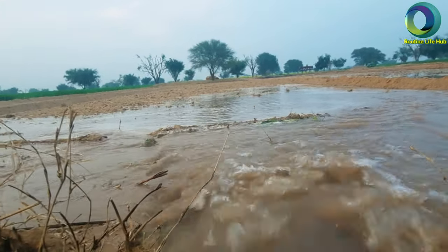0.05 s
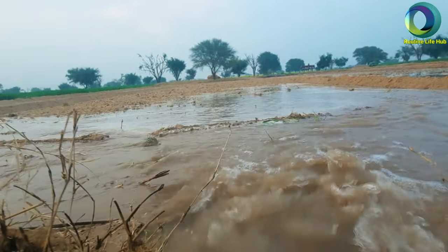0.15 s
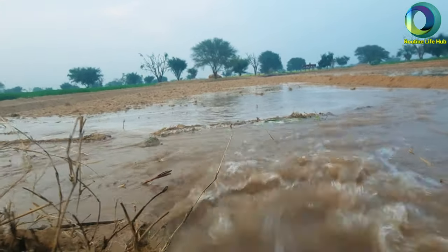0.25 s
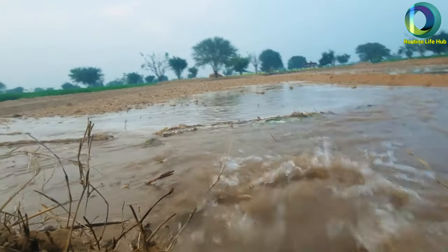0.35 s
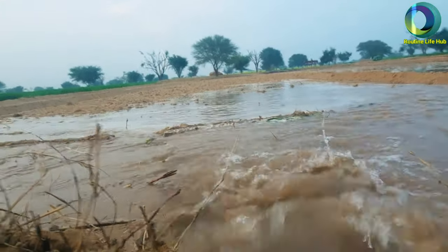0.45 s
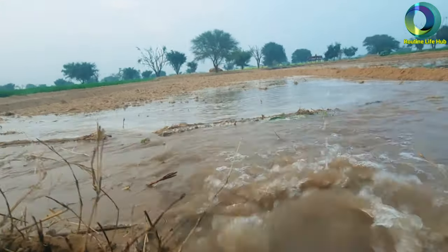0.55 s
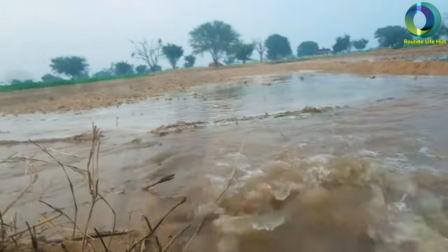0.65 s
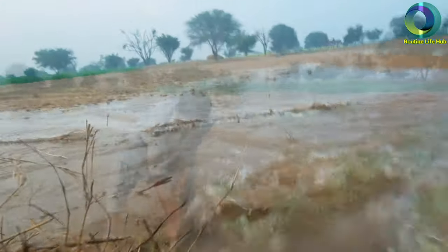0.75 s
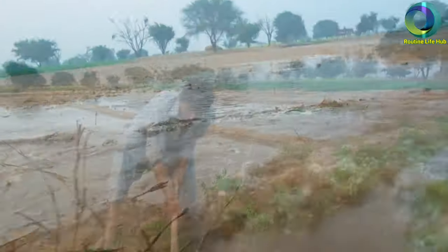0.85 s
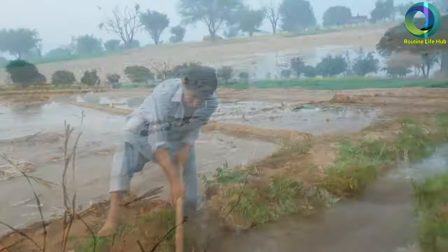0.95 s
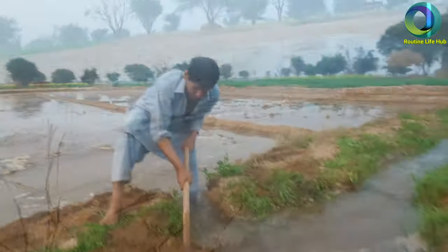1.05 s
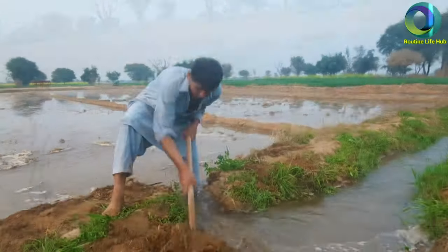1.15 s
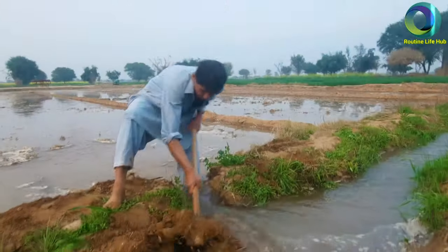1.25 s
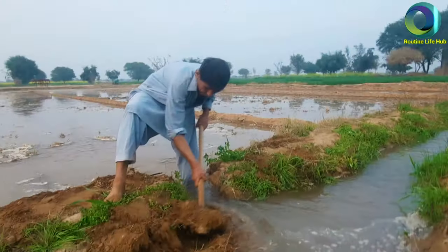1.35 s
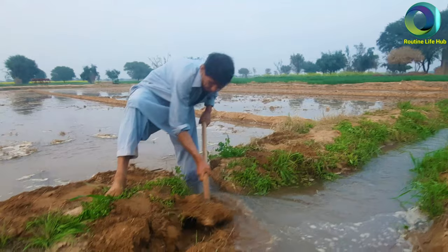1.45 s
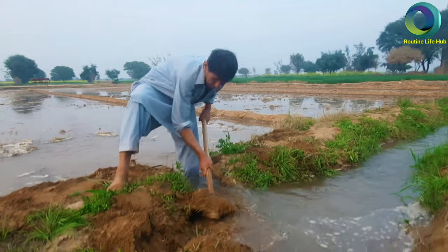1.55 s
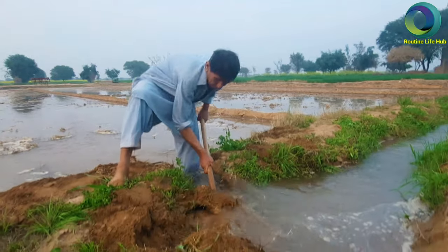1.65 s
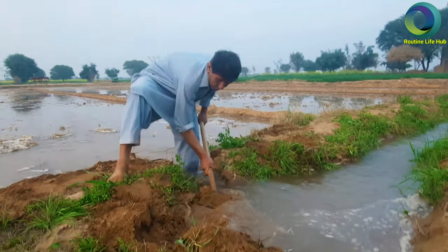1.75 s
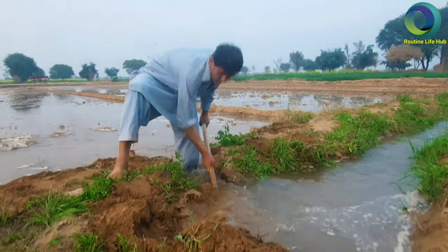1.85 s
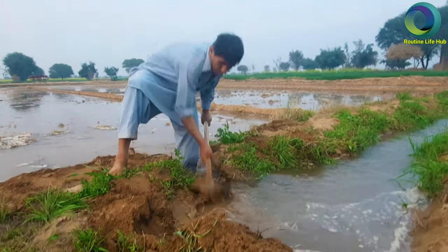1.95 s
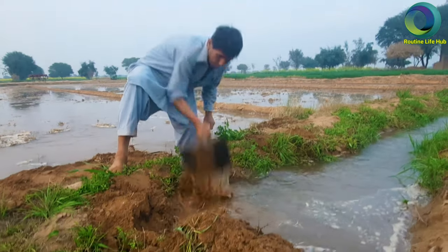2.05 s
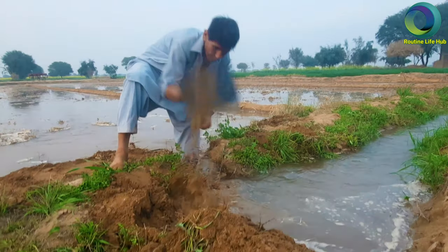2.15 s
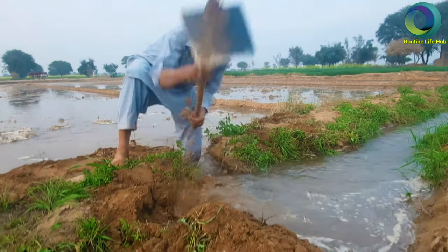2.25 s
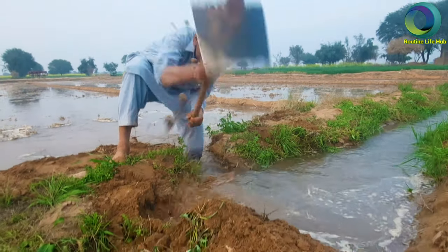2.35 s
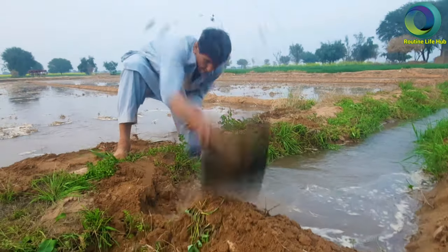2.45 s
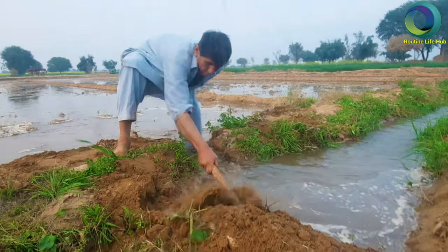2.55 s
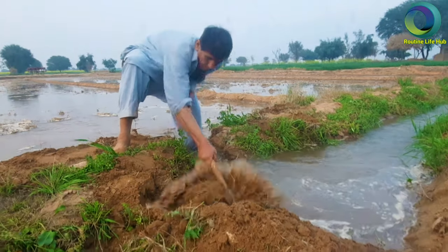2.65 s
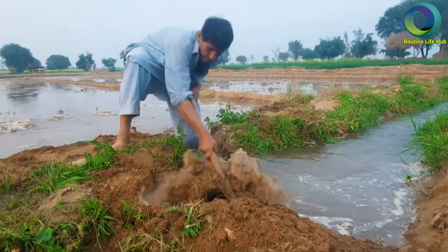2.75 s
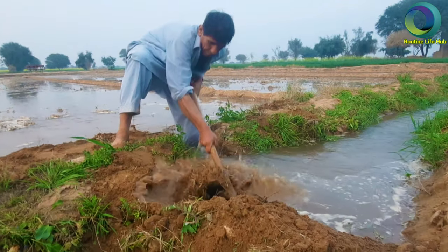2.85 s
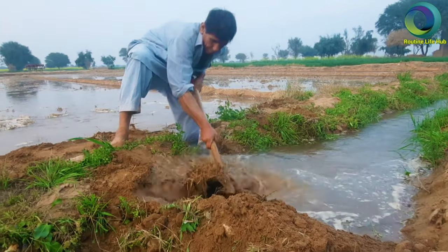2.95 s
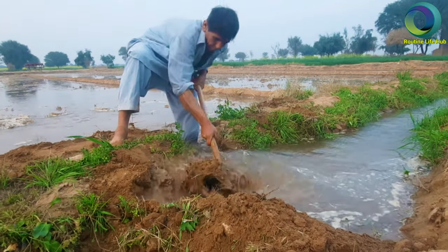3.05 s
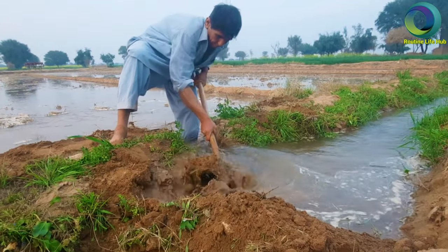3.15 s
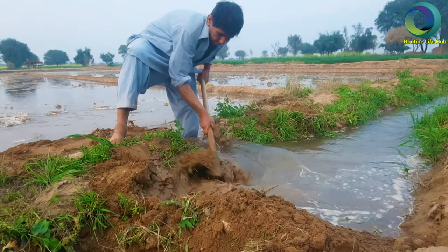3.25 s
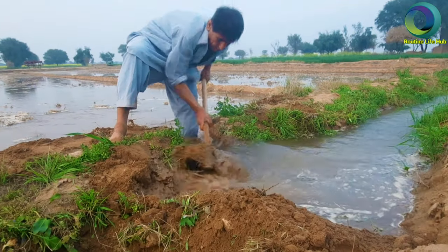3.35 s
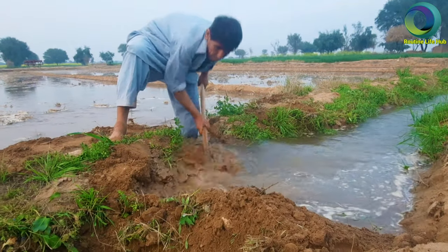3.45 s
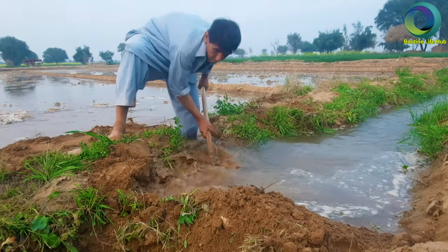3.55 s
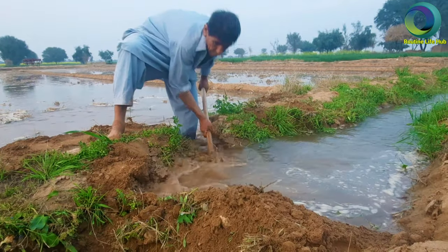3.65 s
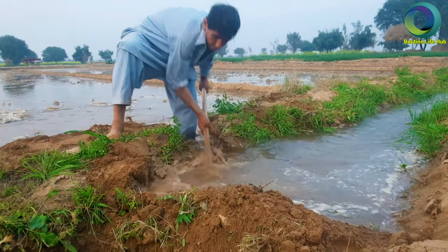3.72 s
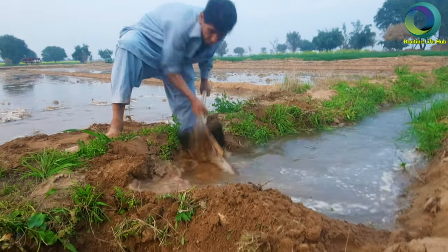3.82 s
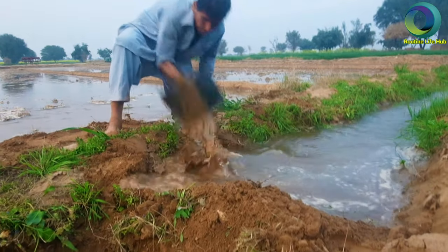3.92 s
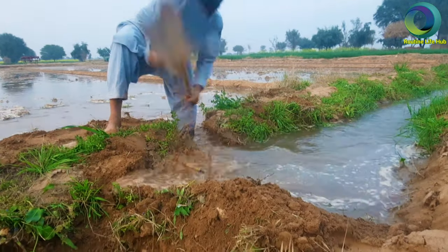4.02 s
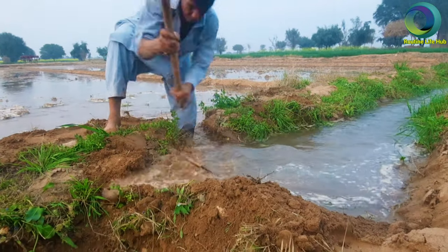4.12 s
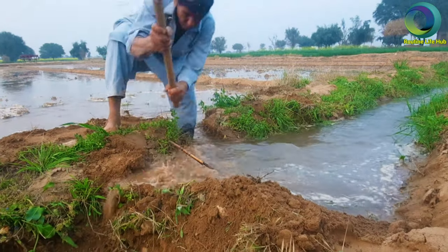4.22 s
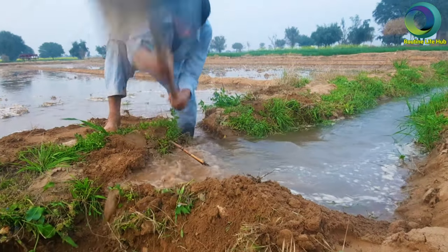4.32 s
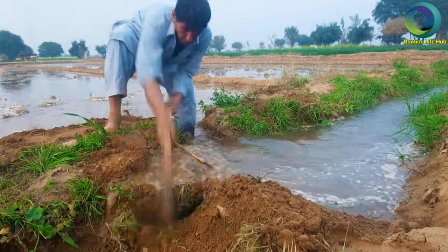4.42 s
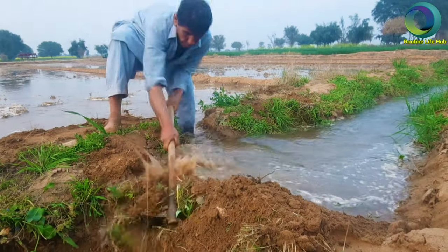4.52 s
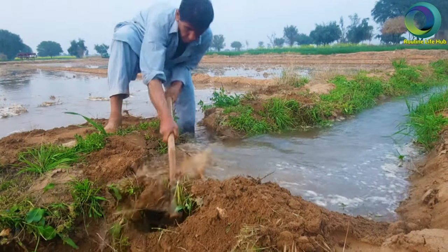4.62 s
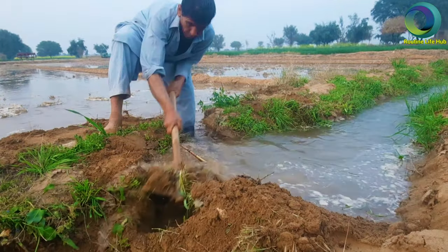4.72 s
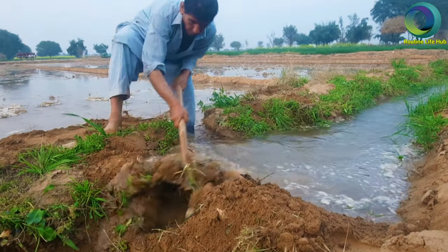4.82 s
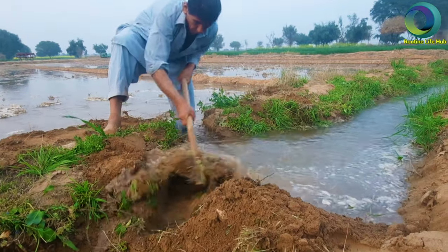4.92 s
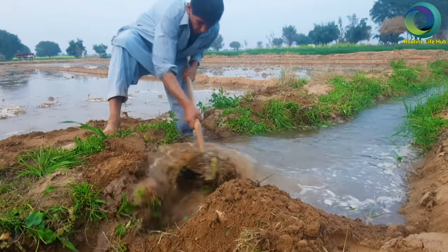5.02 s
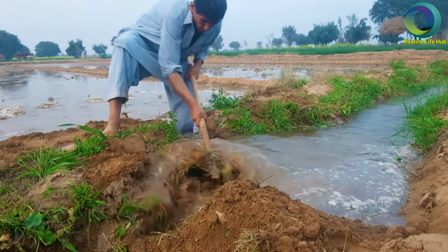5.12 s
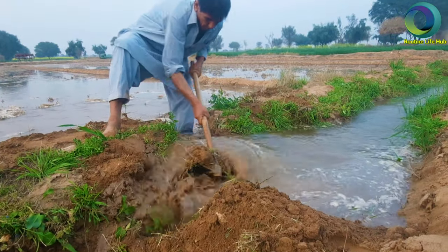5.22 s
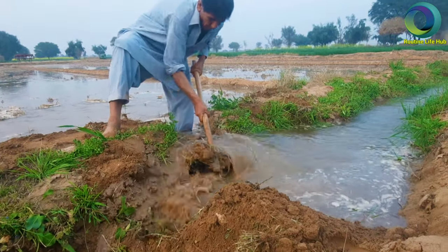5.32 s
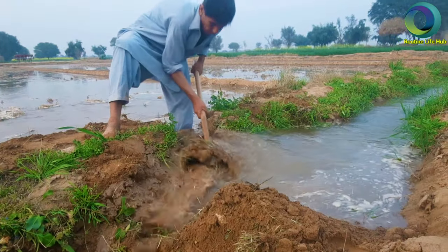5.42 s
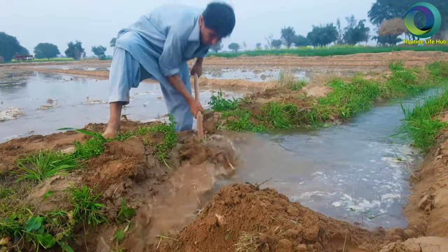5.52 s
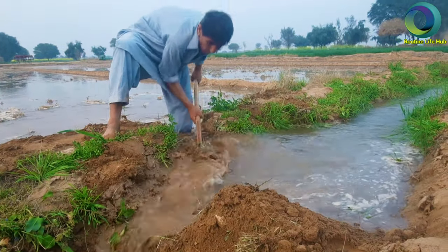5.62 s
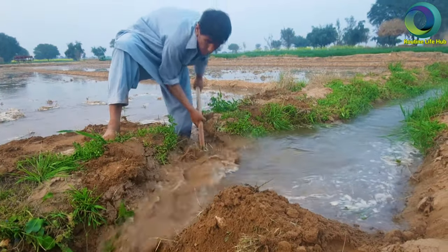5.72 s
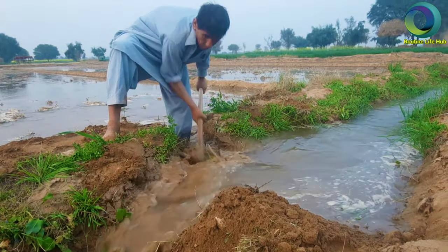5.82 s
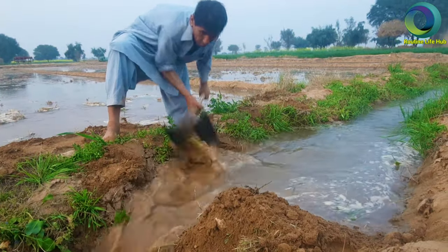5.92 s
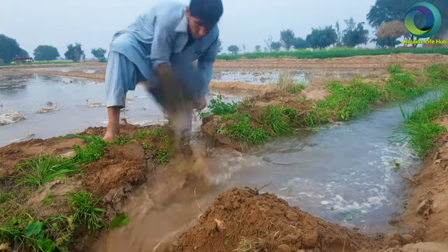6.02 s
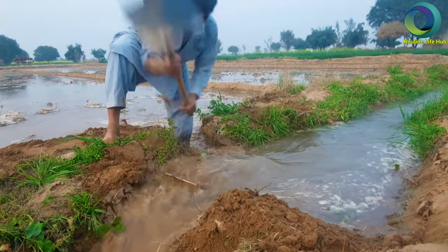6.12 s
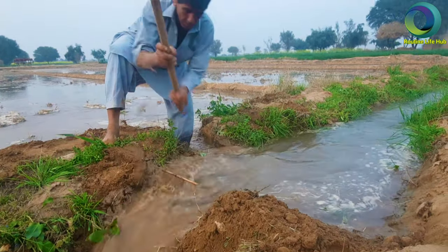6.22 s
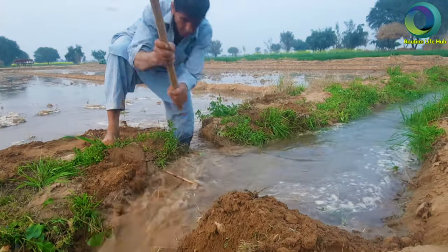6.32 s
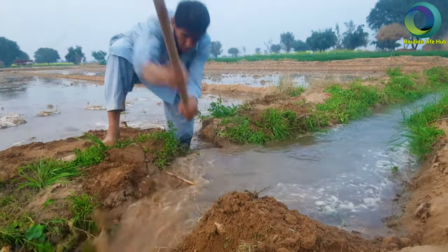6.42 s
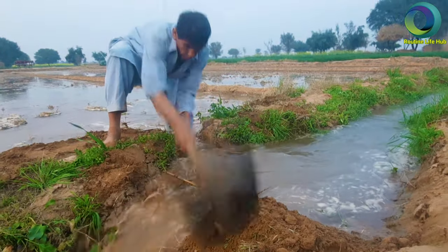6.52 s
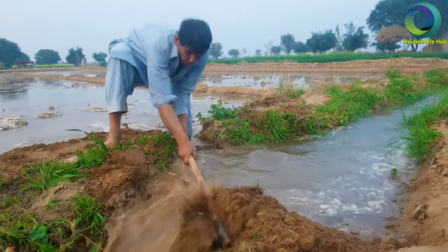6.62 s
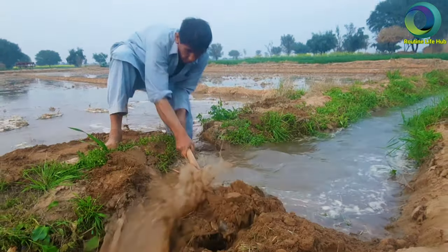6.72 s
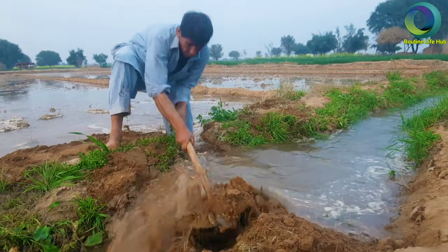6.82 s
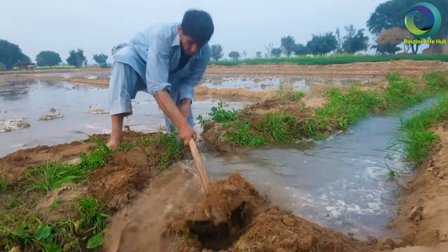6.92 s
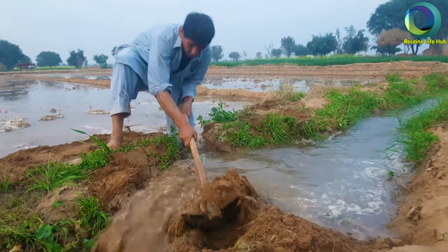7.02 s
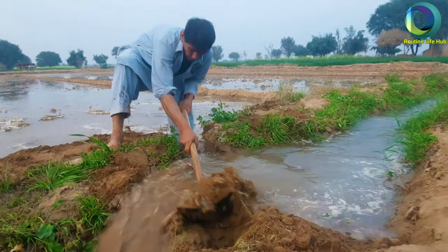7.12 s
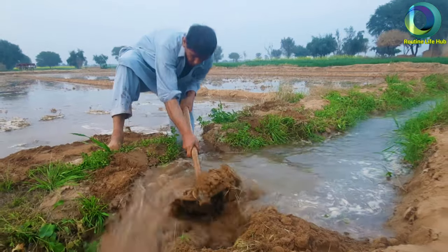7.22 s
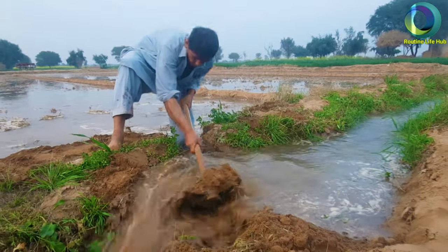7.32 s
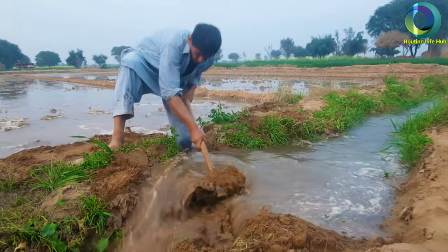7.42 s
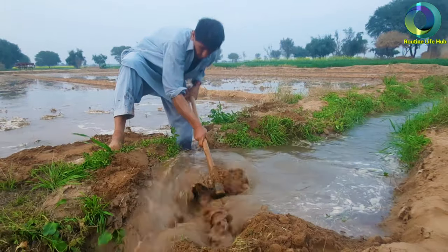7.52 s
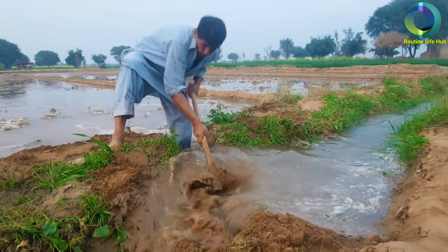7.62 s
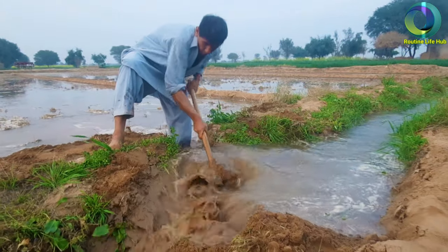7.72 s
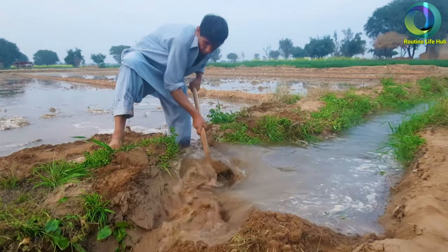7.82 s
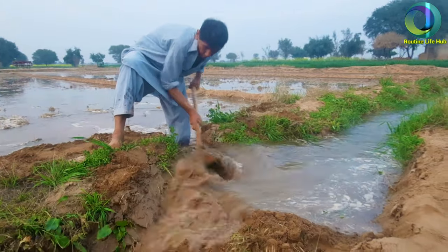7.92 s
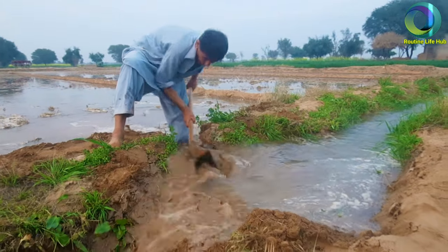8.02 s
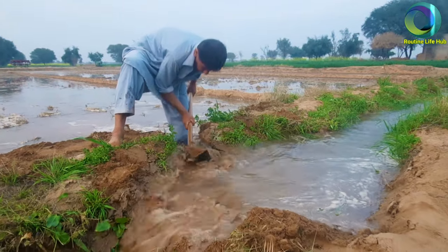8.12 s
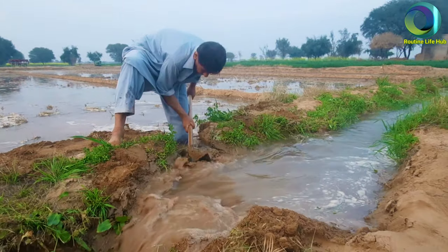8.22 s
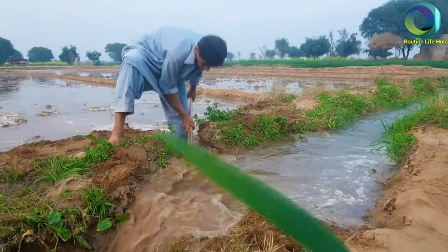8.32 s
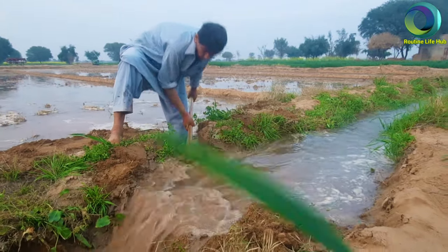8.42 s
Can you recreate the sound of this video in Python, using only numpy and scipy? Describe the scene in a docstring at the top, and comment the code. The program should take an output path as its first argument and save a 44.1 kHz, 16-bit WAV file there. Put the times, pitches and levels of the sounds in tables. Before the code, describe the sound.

Close open-air stereo in a flooded field. From 0 to about 0.6 s, muddy water rushes loudly, with deep gurgling, toppling crests, bright slaps and round gulps, leaning right with faint wind buffets. It fades by 1.25 s into a far quieter channel flow. A sharp blade clack sounds at 1.45 s, then small sloshes, slaps and pattering drops. The hoe bites wet soil at 2.55 s with a crunch and bright clacks; mud sloshes and gulps from 2.9 to 4 s, then almost hushes. A heavier, duller chop at 4.5 s drops clods, followed by sloshing and spatter from 5.1 s as the flow strengthens. A thin trickle enters around 6.2 s, with a hard slap at 6.4 s. The third, strongest thud lands at 6.62 s, then livelier gurgling and deep gulps continue until 8.4 s. A barely audible low drone lies far behind.

```python
"""Muddy irrigation water rushes over a field, then runs more quietly through a channel in an earth bank.
A hoe chops into the wet bank three times; water sloshes, gulps and spatters; a faint drone lies far away.
Water is swarms of ringing bubbles and random clicks, evened out and then ridden by level curves.
Gulps are single rising bubbles, slaps and clacks are filtered noise bursts.
Each chop is crumbly noise over a thud of falling pitch, with knocks of loose soil."""
import sys
import numpy as np
from scipy import signal
from scipy.fft import rfft, irfft
from scipy.io import wavfile
from scipy.ndimage import uniform_filter1d

SR = 44100
rng = np.random.default_rng(int(sys.argv[2]) if len(sys.argv) > 2 else 0)


def wav_out(sig):
    """Save sig, one row per channel (or a flat mono array), as 16-bit PCM at SR to the path in sys.argv[1]."""
    wavfile.write(sys.argv[1], SR, np.round(np.clip(np.atleast_2d(sig).T, -1, 1) * 32767).astype(np.int16))


N = 373086
TIME = np.arange(N) / SR

# where the water is; positive means left louder or left first
# [t/s, left-right level/dB, lead of the left ear/ms, spread of that lead/ms]
PLACE = [(0, -3.5, -0.21, 0.3), (.85, -5, -0.23, 0.3), (1.1, 0, 0.15, 0.11), (3.2, 2, 0.13, 0.17),
         (5.6, 2.5, 0.098, .15), (7.0, 1.4, 0.34, 0.2), (8.4, 1, 0.11, 0.26)]
# rise and fall of a burst of falling or toppling water
SHOWER_ATTACK_S, SHOWER_RELEASE_S = 0.0067, 0.011


def from_db(db):
    """Decibels to gain."""
    return 10 ** (np.asarray(db) / 20)


def rms_one(x):
    """Scale to unit power."""
    return x / np.sqrt(np.mean(x ** 2) + 1e-20)


def read(rows, when):
    """Read the columns of a curve at the given times, with straight lines between its points."""
    s, *columns = np.transpose(rows)
    return [np.interp(when, s, c) for c in columns]


def colour(x, spectrum, size=4096):
    """Causal (minimum-phase) filter with the given spectrum; white noise keeps its power."""
    hz, db = np.transpose(spectrum)
    grid = np.maximum(np.fft.rfftfreq(size, 1 / SR), 1)
    log_gain = np.log(from_db(np.interp(np.log(grid), np.log(hz), db)))
    # folding the cepstrum onto positive time makes the phase minimal
    cepstrum = irfft(log_gain)
    cepstrum[1:size // 2] *= 2
    cepstrum[size // 2 + 1:] = 0
    response = irfft(np.exp(rfft(cepstrum)))
    response = response / np.linalg.norm(response)
    return signal.oaconvolve(x, response[None], axes=1)[:, :x.shape[1]]


def even(x, seconds):
    """Hold the slow level near one and keep the fast grain."""
    width = int(seconds * SR) + 1
    power = uniform_filter1d(np.mean(x ** 2, axis=0), width)
    return x / np.sqrt(uniform_filter1d(power, width) + 1e-12)


def add(out, s, sound, lead_ms):
    """Mix in a short sound, which reaches the right ear lead_ms after the left (before it if negative)."""
    for ear, when in enumerate((s, s + lead_ms / 1000)):
        i = max(int(when * SR), 0)
        part = (sound[ear] if sound.ndim == 2 else sound)[:max(N - i, 0)]
        out[ear, i:i + len(part)] += part


def bubble(hz, cycles, rise, onset_cycles):
    """A trapped air pocket rings down by 60 dB and goes up in pitch as it nears the surface."""
    life = np.arange(int(cycles / hz * SR) + 2) * hz / (cycles * SR)   # 0 to 1
    swell = 1 - np.exp(-life * cycles / onset_cycles)
    decay = np.exp(-np.log(1000) * life)
    turns = cycles * life * (1 + rise * life / 2)   # rise: share by which the pitch climbs
    return swell * decay * np.sin(2 * np.pi * turns)


def bubbling(vigour_db, low_hz, high_hz, cycles, rise, spread_db, count):
    """A swarm of bubbles of all sizes, each at its own place, denser where the water is livelier."""
    crowding = .35   # bubbles arrive at a rate that goes as the gain to this power
    out = np.zeros((2, N))
    when, size, damping, depth = rng.random((4, count))
    born = np.cumsum(from_db(crowding * vigour_db))
    when = np.searchsorted(born, when * born[-1]) / SR
    strength, place = rng.standard_normal((2, count))
    _, lead, width = read(PLACE, when)
    lead_ms = lead + .7 * width * place
    hz = low_hz * (high_hz / low_hz) ** size
    sign = rng.choice([-1, 1], count)
    gain = from_db(spread_db * np.minimum(strength, 2)) * hz * sign
    for k in range(count):
        ring = bubble(hz[k], cycles * (.5 + damping[k]), rise * depth[k], 0.046)
        add(out, when[k], gain[k] * ring, lead_ms[k])
    return rms_one(out)


def crackle(spread_db, clump_db, clump_hz, scatter, count):
    """Tiny clicks at random moments, spread between the ears, with sizes that wax and wane in clumps."""
    at = rng.integers(0, N, count)
    knots = rng.standard_normal(N // 20)
    clumps = np.interp(TIME[at] * clump_hz, np.arange(len(knots)), knots)
    size_db = spread_db * np.minimum(rng.exponential(1, count), 5) + clump_db * clumps
    clicks = from_db(size_db) * rng.choice([-1, 1], count)
    _, lead, width = read(PLACE, TIME[at])
    lead_ms = lead + width * rng.laplace(0, scatter, count)
    lag = np.round(lead_ms * SR / 1000).astype(int)
    right_at = np.clip(at + lag, 0, N - 1)
    return rms_one(np.array([np.bincount(i, clicks, N) for i in (at, right_at)]))


def swells(rows, attack_s, release_s, fade_db_per_s=0):
    """Summed power of bursts that rise, hold or fade slowly while they last, then die away."""
    power = np.zeros(N)
    for s, length, db in rows:
        start = max(int(s * SR), 0)
        t = TIME[:min(SR, N - start)]
        shape = np.minimum(t / attack_s, 1) * np.exp(-np.clip((t - length) / release_s, 0, 20))
        power[start:start + len(t)] += (shape * from_db(db - fade_db_per_s * t)) ** 2
    return power


def drone():
    """A far, low rumble: noise shaped to a low hump, nearly alike in both ears."""
    # colour of the rumble [f/Hz, relative level/dB]
    rumble_spectrum = [(20, -34), (40, -8), (60, -9), (72, 5.5), (88, -8.5), (130, -1), (220, -16.5),
                       (320, -10), (550, -47), (2000, -27)]
    noise = rng.standard_normal((3, N))
    return from_db(-52.5) * rms_one(colour(noise[2] + 0.34 * noise[:2], rumble_spectrum))


def breeze():
    """Light gusts buffet the microphone out on the open field, then drop: sparse clicks turned to bass."""
    # colour of the buffets [f/Hz, relative level/dB]
    buffet_spectrum = [(15, -14), (35, -1), (70, 6), (160, -34), (600, -55)]
    clicks = crackle(spread_db=13, clump_db=-3, clump_hz=10.2, scatter=0.64, count=3000)
    gust_db = np.interp(TIME, [.8, .98], [-50, -85])
    return from_db(gust_db) * even(colour(clicks, buffet_spectrum), 0.2)


def stirring():
    """Power of rush, flow, sloshes and showers summed into dB curves of gurgle, splash, spray and patter."""
    # water rushing over the field, before its fade (gurgle, splash, spray) [level/dB]
    rush_db = (-33.5, -31.5, -33.5)
    # flow in the channel, low while the bank holds and stronger once it is cut [t/s, level/dB]
    flow_curve = [(1.33, -57), (1.75, -49), (3.92, -48), (4.1, -62), (4.35, -64.5), (4.6, -56.5),
                  (4.85, -55), (5.6, -42), (5.82, -47.5), (6.25, -45), (6.7, -42.5), (7.25, -43),
                  (7.6, -38.5), (8.44, -44)]
    # rows gurgle, splash, spray [level at full flow/dB, change per dB of flow/dB]
    flow_voices = [(-47, 1.14), (-42, 0.92), (-38.5, 0.71)]
    # waves of muddy water, breaking in the rush or pushed along by the blade [t/s, length/s, level/dB]
    slosh_rows = [(.04, 0.16, -43), (1.63, 0.11, -45.5), (3.06, 0.15, -42.5), (3.33, 0.21, -42),
                  (3.865, 0.045, -44), (5.14, 0.24, -43), (5.44, 0.22, -47), (5.89, 0.097, -44),
                  (7.46, 0.11, -39.5), (7.68, 0.12, -36.5), (7.92, 0.13, -40), (8.09, 0.093, -38)]
    # a slosh's share in gurgle, splash, spray [relative level/dB]
    slosh_mix_db = (-0.16, .5, -3)
    # mud and water thrown up by the blade rain back down [t/s, length/s, level at the start/dB]
    shower_rows = [(1.62, 0.27, -46.5), (1.9, 0.59, -42), (2.62, 0.33, -41), (2.85, .12, -40.5),
                   (3.42, .12, -43), (3.49, 0.04, -36), (3.88, .05, -41), (3.955, 0.345, -35.5),
                   (4.55, 0.073, -41), (4.86, 0.3, -57), (5.06, 0.61, -44), (5.9, 0.092, -39),
                   (6.16, 0.09, -41), (6.48, 0.12, -36.5), (6.96, 0.23, -40), (8.09, 0.049, -37)]
    # a shower's share in patter, spray [relative level/dB]
    shower_mix_db = (-8.5, 3)
    full_flow_db = -43

    rush = np.interp(TIME, [.55, 1.26], [1, 0]) ** 2   # holds, then fades out
    flow_db = read(flow_curve, TIME)[0] - full_flow_db
    slosh = swells(slosh_rows, attack_s=0.016, release_s=0.055)
    shower = swells(shower_rows, SHOWER_ATTACK_S, SHOWER_RELEASE_S, fade_db_per_s=33)
    power = np.array([from_db(full_db + follows * flow_db) ** 2 for full_db, follows in flow_voices])
    power += np.outer(from_db(rush_db) ** 2, rush)
    power += np.outer(from_db(slosh_mix_db) ** 2, slosh)
    patter, spray = np.outer(from_db(shower_mix_db) ** 2, shower)
    power[2] += spray
    return 10 * np.log10(np.vstack([power, patter + 1e-12]))


def surging(depth_db, per_s):
    """Wavelets break one after another at random: each swells at once and dies away."""
    kicks = 1.0 * (rng.random(N) < per_s / SR)
    swell = signal.lfilter([1], [1, -np.exp(-1 / (0.025 * SR))], kicks + 1e-18)
    swell = uniform_filter1d(swell, SR // 400)
    return from_db(depth_db * np.minimum(rms_one(swell - swell.mean()), 2.5))


def water():
    """Large bubbles gurgle, small ones splash, falling drops patter, and droplets and foam fizz on top."""
    # colours of the three voices [f/Hz, relative level/dB]
    gurgle_spectrum = [(60, -14), (140, -6), (220, -8.5), (310, 2), (430, -2), (600, -1.3), (850, -7),
                       (1600, -44.5)]
    splash_spectrum = [(280, -33), (450, -17.5), (680, -3.5), (900, 0), (1400, -1), (2100, -4.5),
                       (2900, -13.5), (4500, -22)]
    spray_spectrum = [(550, -23.5), (1200, -3), (2200, -1), (3200, 2.5), (5000, -0.5), (6500, 0), (7900, 3),
                      (10500, -4), (13200, -1), (15500, -3.5)]

    gurgle_db, splash_db, spray_db, patter_db = stirring()
    large = bubbling(gurgle_db, 244.8, 900, cycles=26.2, rise=0.99, spread_db=4.0, count=1800)
    small = bubbling(splash_db, 601.0, 3420, cycles=44.6, rise=0.5, spread_db=4.5, count=4800)
    foam = bubbling(spray_db, 2540, 15070, cycles=94, rise=0.14, spread_db=2.0, count=7000)
    falling = bubbling(patter_db, 850, 2300, cycles=25, rise=.4, spread_db=3.5, count=1600)
    churn = crackle(spread_db=2.0, clump_db=0.5, clump_hz=70.1, scatter=.4, count=50000)
    drops = crackle(spread_db=2.5, clump_db=2.5, clump_hz=133.5, scatter=.7, count=80000)
    ticks = crackle(spread_db=3.0, clump_db=3, clump_hz=24.6, scatter=0.64, count=900)
    waves = surging(depth_db=2.0, per_s=22)

    low_churn = from_db(-4.5) * rms_one(colour(churn, gurgle_spectrum))
    gurgle = even(waves * (rms_one(colour(large, gurgle_spectrum)) + low_churn), 0.22)
    mid_churn = from_db(-2.5) * rms_one(colour(churn, splash_spectrum))
    splash = even(waves * (rms_one(colour(small, splash_spectrum)) + mid_churn), 0.12)
    fizz = drops + from_db(-5.5) * foam + from_db(-8.5) * ticks
    spray = even(waves * colour(fizz, spray_spectrum), 0.32)
    patter = even(falling, 0.14)

    leftward = from_db([[.8], [-.8]])
    mix = from_db(gurgle_db) * gurgle + from_db(splash_db) * splash
    return mix + from_db(patter_db) * patter + from_db(spray_db) * spray * leftward


def trickle():
    """A thin stream over the broken bank beats small bubbles of nearly one size into the water."""
    # the stream starts late and stays thin [t/s, level/dB]
    stream_curve = [(5.9, -86), (6.2, -52), (6.5, -43.5), (7.5, -47), (8.4, -49)]
    stream_db = read(stream_curve, TIME)[0]
    beads = bubbling(stream_db, 1950, 2800, cycles=38, rise=0.35, spread_db=4, count=900)
    return from_db(stream_db) * even(beads, 0.073)


def breakers():
    """A toppling crest folds a sheet of small bubbles and drops into the water in a bright gush."""
    # crests toppling in the rush or ahead of the blade [t/s, length/s, level/dB]
    crest_rows = [(.07, .065, -30.5), (.345, .09, -32.5), (.5, .08, -35), (3.492, .035, -35)]
    # colour of the gush [f/Hz, relative level/dB]
    gush_spectrum = [(700, -11), (1300, 0), (3000, -5.5), (7000, -20)]
    power = swells(crest_rows, SHOWER_ATTACK_S, SHOWER_RELEASE_S)
    vigour_db = 10 * np.log10(power + 1e-18)
    froth = bubbling(vigour_db, 900, 4000, cycles=25, rise=.4, spread_db=4, count=600)
    drops = crackle(spread_db=3, clump_db=3, clump_hz=100, scatter=.5, count=40000)
    gush = colour(even(froth, .1) + .5 * drops, gush_spectrum)
    return np.sqrt(power) * even(gush, .1)


def gulps():
    """Cavities close behind the blade and under breaking ripples: some ring and glide up, some only plop."""
    # the loudest gulps [t/s, peak level/dB, starting f/Hz, cycles until 60 dB down]
    gulp_rows = [(.079, -26.5, 287, 29), (.111, -21.5, 726, 30), (.215, -22.5, 540, 33),
                 (.333, -24, 328, 48), (0.5042, -15, 1200, 21.4), (.667, -23.5, 987, 61),
                 (.72, -26, 490, 37), (.775, -22, 830, 27), (1.1975, -38, 310, 9.3),
                 (1.618, -33.5, 302.6, 35), (1.656, -33, 643, 56), (2.081, -23.5, 902, 21.4),
                 (2.8714, -31, 899, 37), (2.895, -31, 1410, 22.4), (3.179, -24, 380, 25),
                 (3.3451, -29, 1216, 22.7), (3.3907, -26, 311, 17), (3.4733, -31.5, 318, 35),
                 (3.5042, -21.5, 1090, 9.6), (3.555, -30.5, 340, 13), (3.599, -30, 296, 11),
                 (3.8657, -28, 824, 15), (3.894, -28.5, 527, 19), (4.0228, -26.5, 1250, 22),
                 (5.2641, -33, 306.4, 39), (5.324, -27.5, 282, 15.4), (5.342, -27.5, 972, 30),
                 (5.3714, -28, 380, 6.8), (5.448, -27.5, 317, 9.9), (5.889, -25, 372.4, 14),
                 (5.891, -28, 594, 17), (6.174, -26, 1668, 34), (6.29, -19, 1370, 26),
                 (6.8294, -32.5, 283, 30), (6.861, -21.5, 536, 25), (6.9915, -28, 580.6, 24),
                 (7.1336, -20.5, 1010, 33), (7.531, -27.5, 340, 16), (7.555, -27, 400, 10),
                 (7.713, -19.5, 332, 15), (7.741, -24.5, 462, 18), (7.787, -28, 470, 9.8),
                 (8.1264, -26, 353, 20.5), (8.171, -29, 473, 24), (8.215, -23, 1915, 44)]
    climb_hz = 400   # climb in pitch over the life of a gulp
    out = np.zeros((2, N))
    for s, db, hz, cycles in gulp_rows:
        ring = bubble(hz, cycles, rise=climb_hz / hz, onset_cycles=0.36)
        add(out, s, from_db(db) * ring / np.abs(ring).max(), read(PLACE, s)[1])
    return out


def burst(hz, width, crack_s, tail_db, tail_s, body_db, snap_db):
    """A sharp, bright contact with a short spatter after it, stressed around one pitch; peak one."""
    t = TIME[:SR // 10]
    noise = rng.standard_normal((3, len(t)))
    crack = noise[2] * np.exp(-t / crack_s)
    spatter = (noise[:2] + noise[2]) * np.exp(-t / tail_s)
    grit = crack + from_db(tail_db) * spatter
    edge = 1 + abs(width)
    ring_band = signal.butter(1, [hz / edge, min(hz * edge, .45 * SR)], "band", fs=SR, output="sos")
    body_band = signal.butter(2, [340, 1300], "band", fs=SR, output="sos")
    ring = signal.sosfilt(ring_band, grit)
    body = signal.sosfilt(body_band, grit)
    snap = np.diff(grit, prepend=0)   # differencing leaves the treble
    sound = rms_one(ring) + from_db(body_db) * rms_one(body) + from_db(snap_db) * rms_one(snap)
    return sound / np.abs(sound).max()


def slaps():
    """Water and lumps of mud slap on the surface: a sharp contact, then a short or long spatter."""
    # the loudest slaps of water and flung mud [t/s, peak level/dB, centre f/Hz, spatter decay/s]
    slap_rows = [(0.0501, -10, 2500, .004), (.26, -13.5, 9000, .0012), (0.428, -12, 2700, .002),
                 (.503, -12, 5500, .007), (0.8929, -18.5, 2830, .004), (1.1965, -28, 1700, 0.0026),
                 (1.563, -24, 1890, 0.0022), (1.635, -17.5, 7940, .003), (1.7345, -15.5, 6500, .003),
                 (1.8105, -13.5, 2350, 0.0021), (2.2327, -17.5, 3260, 0.0046), (2.3958, -19, 8520, .002),
                 (2.947, -22, 4320, .009), (3.5054, -17.5, 1620, .003), (3.8186, -18, 4136, 0.0057),
                 (3.8795, -24, 5000, .004), (5.2655, -14.5, 7150, .004), (5.283, -15.5, 6960, 0.0043),
                 (5.3506, -17.5, 6500, .005), (5.912, -18, 3323, 0.0027), (6.352, -20, 1797, 0.0022),
                 (6.3806, -10.5, 4400, 0.005), (7.107, -20.5, 2340, .007), (7.131, -14, 2600, 0.0079),
                 (8.307, -16, 7190, 0.0044)]
    out = np.zeros((2, N))
    for s, db, hz, spatter_s in slap_rows:
        sound = burst(hz, width=0.39, crack_s=0.001, tail_db=2, tail_s=spatter_s, body_db=-12.0, snap_db=-3.5)
        add(out, s, from_db(db) * sound, .1)
    return out


def debris():
    """Lumps of wet soil tumble over the blade, each a dull knock, fewer and softer as they come to rest."""
    count, lasts_s, fade_db_per_s = 22, .11, 167
    t = TIME[:SR // 5]
    knocks = np.zeros(len(t))
    for when, size, strength in rng.random((count, 3)):
        after = lasts_s * when ** 2   # the square crowds them towards the start
        cycles = np.maximum(t - after, 0) * 160 * 4.2 ** size   # 160 to 672 Hz
        knock = np.sin(2 * np.pi * cycles) * np.exp(-cycles / 0.6)
        knocks += from_db(-8 * strength - fade_db_per_s * after) * knock
    return knocks


def crunch(length_s):
    """Wet soil gives way crumb by crumb: noise of jumpy level under a quick cut and a faint tail."""
    # colour of the crunch [f/Hz, relative level/dB]
    crunch_spectrum = [(100, -16), (400, 11), (800, -1), (2200, 3.5), (4000, 0.5), (7800, 3.5), (16000, -1)]
    t = TIME[:SR // 5]
    crumbs = np.interp(t * 500, np.arange(100), rng.standard_normal(100))   # one every two milliseconds
    crumb_db = 2 * rng.standard_normal(len(t)) + 0.82 * crumbs
    grit = rng.standard_normal((3, len(t))) * from_db(crumb_db)
    tail = from_db(-15.0) * np.exp(-t / 0.048)
    cut = (1 - np.exp(-t / 0.0019)) * (np.exp(-(t / length_s) ** 2) + tail)
    return colour((grit[:2] * 1.23 + grit[2] * 0.14) * cut, crunch_spectrum)


def thud(start_hz, length_s):
    """A blow sinks towards 62 Hz as the soil brakes it by fits and starts, which shake its pitch."""
    jerk = .17   # share by which uneven soil shakes the pitch
    t = TIME[:SR // 5]
    hz = 62 + (start_hz - 62) * np.exp(-(t / 0.01534) ** 1.44)
    hz = hz * np.exp(jerk * np.interp(t * 200, np.arange(40), rng.standard_normal(40)))
    push = (1 - np.exp(-t / 0.0036)) * np.exp(-(t / length_s) ** 2)
    return push * np.sin(2 * np.pi * np.cumsum(hz) / SR)


def clod(hz):
    """Soft earth drops back: a few cycles that sag in pitch; peak one."""
    t = TIME[:SR // 5]
    sagging = np.sin(2 * np.pi * hz * 0.0355 * np.log(1 + t / 0.038))
    plop = sagging * (1 - np.exp(-t / 0.00032)) * np.exp(-t / 0.0029)
    return plop / np.abs(plop).max()


def hoe():
    """The blade crunches and thuds into wet soil, clods drop back, and it clacks on grit and hard clods."""
    # hoe blows [t/s, crunch level/dB, crunch length/s, thud delay/s,
    #            thud level/dB, thud start f/Hz before the shake, thud length/s]
    blow_rows = [(2.559, -25.5, 0.029, 0.00036, -31, 440, 0.043),
                 (4.5045, -20, 0.03, 0.0057, -19.5, 190, 0.043),
                 (6.6211, -17, 0.014, 0.006, -17, 438, 0.027)]
    # large clods break off and drop back in a blow [t/s, peak level/dB, nominal f/Hz]
    clod_rows = [(2.563, -27.5, 320), (2.588, -25, 370), (2.606, -23, 330), (4.51, -17, 380),
                 (4.522, -17, 330), (6.629, -19, 440), (4.607, -24.5, 310), (4.6208, -27, 350),
                 (6.634, -19.5, 392), (6.651, -22, 299), (6.644, -27, 740), (4.5134, -21.5, 540)]
    # the blade on grit and hard clods [t/s, peak level/dB, ring f/Hz, dull knock beside the ring/dB]
    clack_rows = [(1.4533, -5.5, 7550, -6.5), (2.5731, -5, 2370, -40), (2.584, -5.5, 10900, -25),
                  (4.5117, -14.5, 1996, -12), (4.5355, -17, 1910, -7), (6.626, -8, 3020, -3),
                  (6.6426, -11, 2427, -23), (6.6453, -10, 2020, 10)]
    debris_db = -5   # relative to the thud

    out = np.zeros((2, N))
    for s, crunch_db, crunch_s, delay, thud_db, thud_hz, thud_s in blow_rows:
        add(out, s, from_db(crunch_db) * crunch(crunch_s), .12)
        impact = thud(thud_hz, thud_s) + from_db(debris_db) * debris()
        add(out, s + delay, from_db(thud_db) * impact, .1)
    for s, db, hz in clod_rows:
        add(out, s, from_db(db) * clod(hz), .1)
    for s, db, hz, knock_db in clack_rows:
        clack = burst(hz, width=0.14, crack_s=0.00035, tail_db=-20, tail_s=0.0045,
                      body_db=knock_db, snap_db=-3.5)
        add(out, s, from_db(db) * clack, .03)
    return out


def scene():
    """Water and hoe share one place, which shifts from side to side, over the drone and the breeze."""
    far = drone() + breeze()
    near = water() + trickle() + breakers() + gulps() + slaps() + hoe()
    side_db = read(PLACE, TIME)[0]
    return far + near * from_db(np.array([side_db, -side_db]) / 2)


def record(dry):
    """The microphone has two hollows and loses the deepest bass; the top is cut steeply."""
    # hollows in the microphone's response [f/Hz, Q, depth 0-1]
    hollow_rows = [(215, 2.45, 0.28), (9350, 3.8, 0.64)]
    cutoff_hz = 15750
    for hz, q, depth in hollow_rows:
        dry = dry - min(depth, 1) * signal.lfilter(*signal.iirpeak(hz, q, fs=SR), dry)
    dry = signal.sosfilt(signal.butter(3, 38, "high", fs=SR, output="sos"), dry)
    return signal.sosfilt(signal.ellip(12, .1, 90, cutoff_hz, fs=SR, output="sos"), dry)


dry = scene()
out = record(dry)
wav_out(out)
```